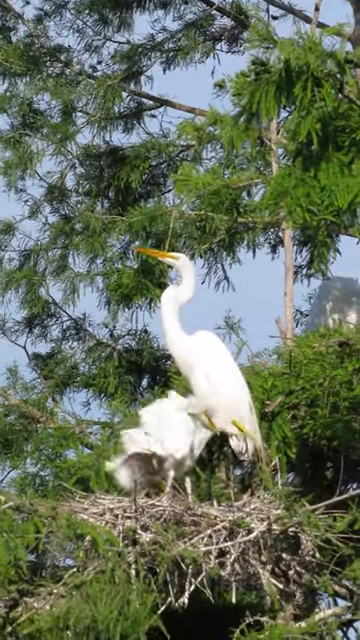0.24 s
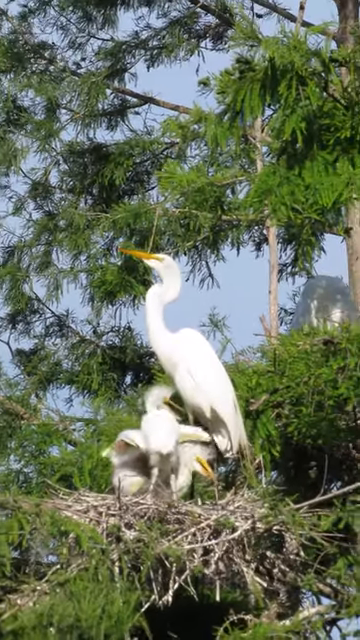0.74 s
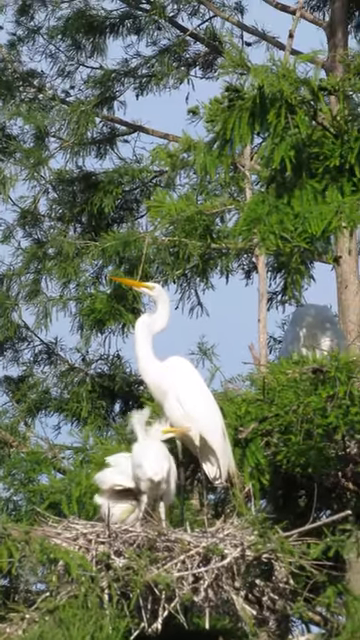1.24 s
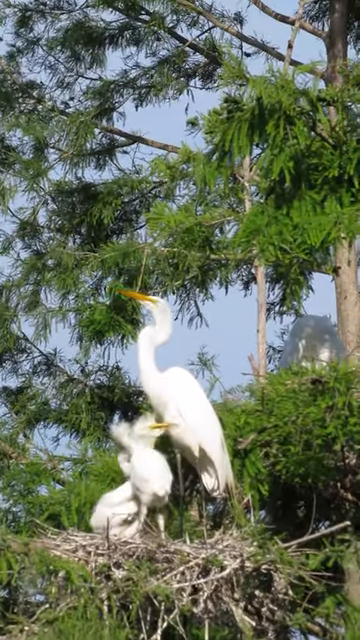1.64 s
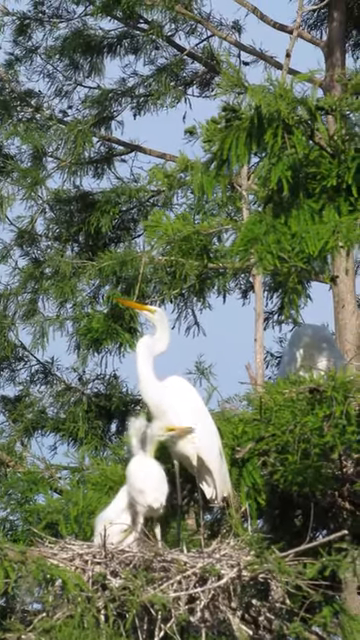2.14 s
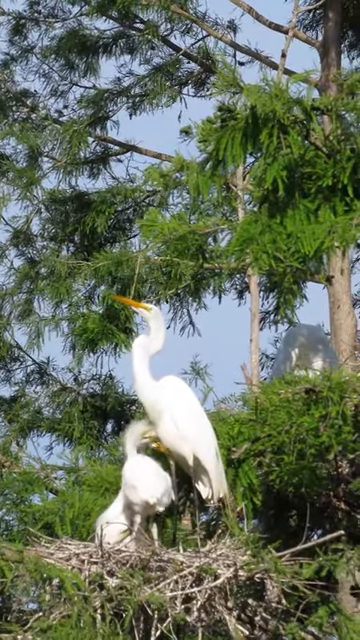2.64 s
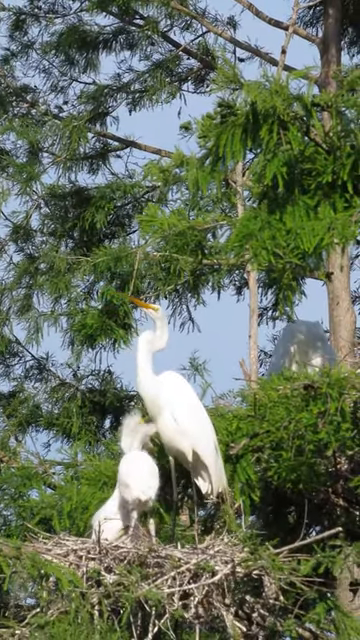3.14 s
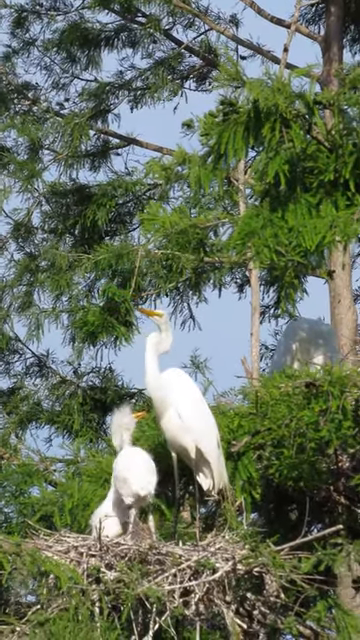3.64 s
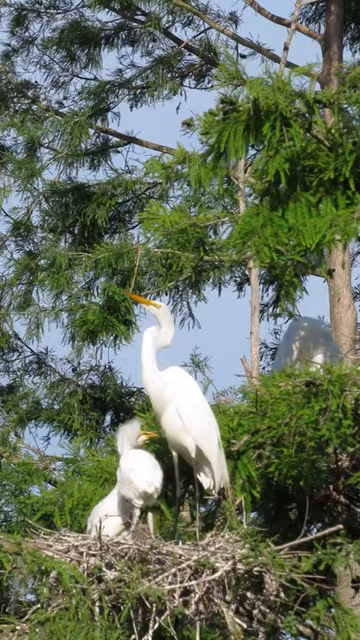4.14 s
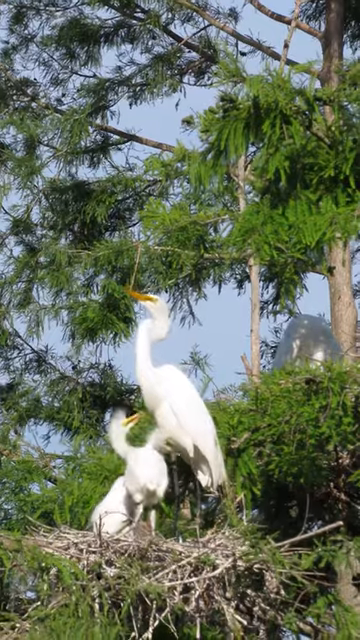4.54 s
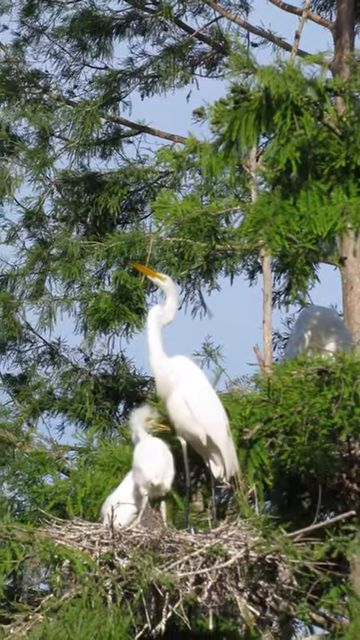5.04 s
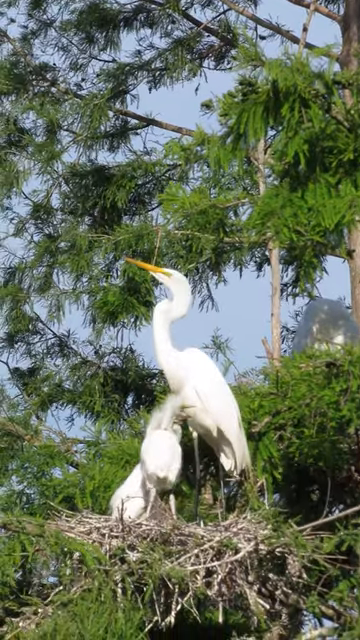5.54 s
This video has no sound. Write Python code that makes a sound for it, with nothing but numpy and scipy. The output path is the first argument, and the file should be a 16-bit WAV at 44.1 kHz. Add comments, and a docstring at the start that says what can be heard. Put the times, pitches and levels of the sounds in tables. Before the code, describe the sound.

Egret chicks beg with a steady run of short, harsh squawks and a few bill snaps over a faint low hum.

```python
"""Egret chicks begging at the nest

High in a tree the chicks give a run of short harsh calls: rough syrinx pulses ring through windpipe,
throat and gaping bill, and now and then a bill snaps. Early on a far egret croaks and a songbird
whistles; the wood throws it all back. The colony murmurs in front, while a low hum and light wind
reach the two microphones of a small camera separately."""
import sys
import numpy as np
from scipy import signal
from scipy.io import wavfile
from scipy.ndimage import uniform_filter1d

SR = 44100
rng = np.random.default_rng(int(sys.argv[2]) if len(sys.argv) > 2 else 0)


def pcm_store(signal):
    """Save signal as 16-bit PCM."""
    levels = np.round(np.clip(np.atleast_2d(signal), -1, 1) * 32767)
    wavfile.write(sys.argv[1], SR, levels.astype(np.int16).T)


N = 255339


def gain_of(db):
    """Decibels to gain."""
    return 10 ** (np.asarray(db) / 20)


def unit_rms(x):
    """Scales to rms 1."""
    return x / np.sqrt(np.mean(x ** 2) + 1e-20)


def curve_at(points, hz):
    """Reads a table on a log-frequency axis."""
    f, value = np.transpose(points)
    return np.interp(np.log(hz + 1), np.log(f + 1), value)


def add(mix, start_s, sound):
    """Drops a sound into the mix."""
    part = mix[max(round(start_s * SR), 0):][:len(sound)]
    part += sound[:len(part)]


def resonate(x, hz, width_hz):
    """A steep, sweepable resonance: shift hz down to zero, smooth twice, shift back."""
    carrier = np.exp(2j * np.pi * np.cumsum(hz * np.ones(len(x))) / SR)
    r = np.exp(-np.pi * width_hz / SR)
    return 2 * (carrier * signal.lfilter([(1 - r) ** 2], [1, -2 * r, r * r], x / carrier)).real


def wander(n, size):
    """Random drift of rms 1, smoothed over size samples."""
    return unit_rms(uniform_filter1d(rng.standard_normal(n), size))


def patchy_noise(spectrum, patchy_db, channels, patch_bins):
    """A shaped noise bed of rms 1 in which patches of the spectrum swell and fade."""
    frames, hz = N // 256 + 5, np.fft.rfftfreq(1024, 1 / SR)
    real, imag, patches = rng.standard_normal((frames, 513, channels, 3)).T
    patches = unit_rms(uniform_filter1d(uniform_filter1d(patches, patch_bins, 1), 14, 2))
    spectra = (real + 1j * imag) * gain_of(curve_at(spectrum, hz)[:, None] + patchy_db * patches)
    return unit_rms(signal.istft(spectra, nperseg=1024, noverlap=768)[1][:, :N])


# Tone colour of the hum and hiss: f/Hz, relative level/dB
HUM_SPECTRUM = [(15, -39), (40, -10), (110, 2.5), (230, -4.5), (430, -11.5), (516, -9.5), (620, -20.5),
                (690, -42.5), (780, -18), (950, -18), (1500, -26), (2500, -49), (5000, -34), (8000, -32.5),
                (11000, -34), (14800, -41.5)]
# Hum faders: left level/dB, right level/dB
HUM_LEVELS = [-42.5, -43.5]


def hum():
    """A wide bed of low hum and faint hiss, separate noise on each microphone."""
    bed = gain_of(HUM_LEVELS)[:, None] * patchy_noise(HUM_SPECTRUM, 0.36, channels=2, patch_bins=12)
    return bed - 0.03 * bed[::-1]  # the sides lean slightly apart in phase


# Tone colour of the colony: f/Hz, relative level/dB
COLONY_SPECTRUM = [(500, -6), (900, 5), (1300, 6.5), (2000, 4.5), (3100, 6.5), (4200, 2), (5000, -4.5),
                   (7000, -6), (10000, -14.5), (14000, -45)]
# Fader ride of the colony: t/s, level/dB
COLONY_LEVELS = [(0, -52), (.4, -55), (.6, -53), (5.79, -52)]


def colony():
    """Many birds blur into a shifting murmur, dead centre."""
    level_db = np.interp(np.arange(N) / SR, *np.transpose(COLONY_LEVELS))
    return gain_of(level_db) * patchy_noise(COLONY_SPECTRUM, 3.45, channels=1, patch_bins=4)


# Gusts on the microphones: peak t/s, level/dB, rise and fall/s
WIND_GUSTS = [(1.15, -65, 0.084), (4.35, -44, .15), (4.75, -34.5, .1), (5.1, -45, 0.15)]


def wind(calm_db=-78):
    """Air buffets each microphone on its own: a lumpy rumble, strongest to the sides."""
    lumps = gain_of(1.5 * np.array([wander(N, size=3000), wander(N, size=3000)]))
    low_band = signal.butter(2, [18, 75], "band", fs=SR, output="sos")
    rumble = signal.sosfilt(low_band, rng.standard_normal((2, N)))
    rumble = rumble - 0.54 * rumble[::-1]
    t = np.arange(N) / SR
    gusts = sum(gain_of(db) * np.exp(-((t - s) / width) ** 2) for s, db, width in WIND_GUSTS)
    return (gain_of(calm_db) + gusts) * unit_rms(lumps * rumble)


def syrinx(hz, rough):
    """The egret's voice source: jittered, uneven pulses with a puff of noise in each cycle."""
    turns = np.cumsum(hz * (1 + .1 * rough * wander(len(hz), size=120))) / SR
    cycle = turns.astype(int)
    strength = gain_of(0.77 * rough * rng.standard_normal(2000)[cycle])
    pulses = strength * (np.diff(cycle, prepend=-1) > 0)
    puffs = (0.31 + np.exp(-(turns % 1) / 0.38)) * rng.standard_normal(len(hz))
    return np.sqrt(1 - rough) * unit_rms(pulses) + np.sqrt(rough) * unit_rms(puffs)


# Far egret cues: t/s, length/s, level/dB, first throat f/Hz, last throat f/Hz
FAR_CROAKS = [(0, 0.016, -48.5, 1530, 1520), (0.027, 0.031, -50, 1510, 1510),
              (0.074, 0.034, -52, 1530, 1500), (0.191, 0.18, -52, 1240, 1250),
              (0.344, 0.062, -50, 1225, 1380)]


def croak(length, db, first_hz, last_hz):
    """Slow rough pulses through one throat resonance, swelling and fading."""
    n = round(length * SR)
    pulses = syrinx(hz=np.full(n, 150.), rough=0.53)
    throat = resonate(pulses, np.linspace(first_hz, last_hz, n), width_hz=190)
    return gain_of(db) * signal.windows.tukey(n, .6) * unit_rms(throat)


# Songbird phrase, one curve a note: t/s, f/Hz, level/dB
SONGBIRD_NOTES = [
    [(.124, 6600, -54), (.13, 7550, -49), (.138, 7650, -52), (.15, 7950, -60)],
    [(.17, 3120, -62), (.195, 3050, -58), (.215, 3010, -65)],
    [(.25, 6390, -59), (.29, 6900, -54), (.33, 7450, -49), (.36, 7480, -49), (.425, 7330, -50)],
    [(.44, 2500, -62), (.46, 2500, -58), (.48, 2490, -62)],
    [(.48, 8050, -65), (.5, 8100, -62), (.53, 8100, -65)],
    [(.51, 3115, -59), (.528, 3126, -54), (.56, 3140, -58)],
    [(.535, 6330, -58), (.547, 6417, -50), (.57, 6400, -56), (.641, 6440, -59), (.7, 6550, -55),
     (.72, 6550, -62)],
]


def whistle(note):
    """A songbird's gliding near-sine, trembling a little in pitch and level."""
    times, pitches, levels = np.transpose(note)
    t = np.arange(times[0], times[-1], 1 / SR)
    hz = np.interp(t, times, pitches) * (1 + .003 * wander(len(t), size=150))
    db = np.interp(t, times, levels) + 3 * wander(len(t), size=250)
    return np.sin(2 * np.pi * np.cumsum(hz) / SR) * gain_of(db) * signal.windows.tukey(len(t), .1)


def windpipe(x, spacing_hz, bounce):
    """An open tube: each pulse bounces to and fro, leaving evenly spaced resonances."""
    at = np.arange(len(x))
    return sum(bounce ** k * np.interp(at - k * SR / spacing_hz, at, x, left=0) for k in range(9))


def steadied(x):
    """Gentle levelling, as from a steady breath."""
    return x / np.sqrt(uniform_filter1d(x ** 2, 400) + 0.44 * np.mean(x ** 2))


# Chick cues, levels before shaping: t/s, length/s, gape level/dB, first gape f/Hz, wide gape f/Hz,
# opening time/s, throat level/dB, first throat f/Hz, first windpipe spacing/Hz, first pulse rate/Hz,
# rasp f/Hz, rasp level/dB
BEGGING_CALLS = [(.624, 0.05, -38, 1860, 2400, 0.058, -57, 2060, 601, 271.6, 5900, -57),
                 (0.834, 0.077, -39, 2670, 3360, 0.039, -38.5, 2350, 594, 312.7, 5240, -54.5),
                 (1.029, .075, -40, 2640, 3950, 0.036, -35.5, 2570, 602, 439.3, 6800, -58),
                 (1.300, 0.059, -46.5, 3900, 4220, 0.018, -38.5, 2200, 603, 330.7, 5200, -58),
                 (1.491, 0.099, -41, 2660, 3930, 0.037, -42.5, 2190, 597, 241.5, 6760, -59.5),
                 (1.74, 0.064, -34.5, 2170, 3280, 0.039, -33, 2220, 603, 247.7, 5500, -57.5),
                 (1.927, .072, -38, 2520, 3380, 0.038, -34.5, 2440, 601, 356.4, 4480, -49),
                 (2.187, 0.072, -35.5, 1850, 3540, 0.046, -33.5, 2160, 584, 308.5, 4970, -57.5),
                 (2.376, 0.087, -35.5, 3370, 4300, 0.031, -37.5, 2270, 604, 303, 6750, -59.5),
                 (2.629, 0.066, -32.5, 2270, 3200, 0.043, -31.5, 2390, 602, 363.7, 4430, -51),
                 (2.824, 0.062, -31.5, 3000, 4020, 0.023, -42, 2070, 610, 322.8, 5900, -50.5),
                 (3.073, 0.079, -40.5, 1960, 3950, 0.051, -32.5, 2270, 604, 373.7, 5600, -57),
                 (3.262, 0.074, -36, 2600, 4260, 0.046, -33.5, 2360, 608, 366.5, 5830, -53),
                 (3.527, .075, -36, 2180, 3300, 0.046, -34, 2250, 604, 328, 5100, -63),
                 (3.715, 0.072, -37, 2790, 3500, .045, -36.5, 2280, 601, 299.2, 4840, -53),
                 (3.805, 0.052, -51, 3300, 3500, .025, -51.5, 2320, 550, 400, 5500, -61),
                 (3.977, 0.067, -35.5, 2380, 3620, 0.048, -36, 2350, 605, 209, 5200, -53.5),
                 (4.163, .072, -34, 2750, 3760, 0.039, -39, 2320, 607, 294.8, 4870, -50.5),
                 (4.421, 0.079, -40.5, 1930, 3370, 0.052, -35, 2180, 592, 308.6, 4760, -53),
                 (4.625, 0.069, -36.5, 2840, 3540, 0.028, -43, 2060, 606, 507.4, 4970, -51.5),
                 (4.796, 0.055, -48, 4340, 4200, 0.021, -40.5, 1960, 543, 498.5, 5200, -58),
                 (4.886, 0.09, -33, 2150, 2870, 0.041, -39, 2220, 588, 315.8, 4730, -53),
                 (5.048, 0.068, -49.5, 4270, 4300, .012, -40.5, 2040, 542, 469.4, 5800, -58),
                 (5.071, 0.086, -41, 2300, 4150, .042, -35, 2370, 606, 400, 6340, -58),
                 (5.287, 0.062, -41.5, 4500, 4450, 0.014, -38.5, 1980, 545, 465, 5800, -51.5),
                 (5.347, 0.077, -34.5, 2140, 3100, 0.037, -39.5, 2040, 594, 311.2, 5300, -59),
                 (5.533, 0.05, -40.5, 4500, 4480, 0.015, -38, 2010, 549, 396, 5900, -51),
                 (5.539, 0.076, -39.5, 2500, 3900, 0.043, -34.5, 2160, 608, 316.3, 5550, -55),
                 (5.749, 0.028, -56, 2930, 3200, .02, -48, 2120, 600, 715, 6000, -71)]


def beg(length, gape_db, first_gape_hz, wide_hz, wide_s, throat_db, throat_hz, spacing_hz, pulse_hz,
        rasp_hz, rasp_db):
    """A chick's squawk: the pulses speed up as the bill opens, sweeps the gape resonance and shuts."""
    t = np.arange(0, length, 1 / SR)
    hold_s, closing_s, swell_s, release_s, edge_s = 0.0065, 0.038, 0.015, 0.02, 0.003
    opening = np.sin(np.pi / 2 * np.minimum(t / wide_s, 1)) ** 1.55
    closing = np.clip((t - wide_s - hold_s) / closing_s, 0, 1) ** 0.97
    # a call begun with the bill shut starts softer and swells
    shut_khz = max(2830 - first_gape_hz, 0) / 1000
    swell_db = (-1.5 - 12.5 * shut_khz) * np.exp(-(t / swell_s) ** 2)
    breath_db = swell_db - 5.5 * np.clip(1 - (length - t) / release_s, 0, 1)
    bill_db = 3 * (1 - opening) - 15.5 * closing + breath_db

    strain = np.tanh(t / 0.063)  # faster pulses, a shorter neck
    pulses = syrinx(pulse_hz * (1 + .17 * strain), rough=.2 + .33 * t / t[-1])
    pipe_hz = spacing_hz * (1 + 0.071 * strain)
    tube = windpipe(pulses, pipe_hz, bounce=0.54)

    # the throat ducks around the widest gape, more after a long climb
    climb_khz = max(wide_hz - first_gape_hz, 0) / 1000
    duck_db = -10 * climb_khz * np.exp(-((t - 0.99 * wide_s) / 0.011) ** 2)
    throat_db = throat_db + duck_db + 0.5 * (1 - closing) + breath_db
    throat_hz = throat_hz - 148 * (t / length) ** 3  # sags as the breath runs out
    throat = resonate(resonate(tube, throat_hz, 1020), throat_hz, 1020)
    throat = gain_of(throat_db) * steadied(throat)

    gape_hz = first_gape_hz + (wide_hz - first_gape_hz) * (opening - closing)
    gape = resonate(resonate(tube, gape_hz, 1680), gape_hz, 1700)
    bill_lowpass = signal.butter(6, 4620, fs=SR, output="sos")
    gape = gain_of(gape_db + bill_db) * steadied(signal.sosfilt(bill_lowpass, gape))

    # a shut bill holds the rasp back until it opens
    rasp_db = rasp_db + .5 * bill_db - 3 * shut_khz * (0.5 - opening)
    rasp = gain_of(rasp_db) * unit_rms(resonate(tube, rasp_hz, 3100) + 0.043 * tube)
    chest_db = throat_db - 22 + 0.15 * (597 - spacing_hz)  # fuller in a longer neck
    chest = gain_of(chest_db) * unit_rms(resonate(tube, 2 * pipe_hz, 120))
    fades = np.minimum(t / edge_s, 1) * np.minimum((length - t) / edge_s, 1)
    return (throat - gape + rasp + chest) * fades


# Bill snap cues: t/s, level/dB, f/Hz
BILL_SNAPS = [(3.148, -37, 1580), (3.787, -38.5, 1480), (4.047, -34, 1490), (5.7363, -39.5, 1380)]


def snap(db, hz, attack_s=0.00027, t60_s=0.022):
    """A short hollow knock of the bill: one damped mode."""
    t = np.arange(400) / SR
    return gain_of(db - 60 * t / t60_s) * np.sin(2 * np.pi * hz * t) * np.minimum(t / attack_s, 1)


# Reverb time of the wood: f/Hz, t60/s
WOOD_DECAY = [(1000, 0.45), (2600, 0.33), (5000, 0.38), (9000, 0.21)]


def wood_echo(x):
    """Trunks and leaves scatter the sound: sparse taps, each band dying at its own speed."""
    taps = np.zeros(SR // 2)
    at = np.arange(300, SR // 2 - 20, 20) + rng.integers(0, 20, (SR // 2 - 301) // 20)
    taps[at] = rng.choice([-1., 1.], at.shape)
    hz, t, spectra = signal.stft(taps, SR, nperseg=256)
    decay = gain_of(-60 * t / curve_at(WOOD_DECAY, hz)[:, None])
    tail = signal.istft(spectra * decay, SR, nperseg=256)[1]
    return signal.fftconvolve(x, tail / np.linalg.norm(tail))[:N]


def leafy_echo(x, flutter_hz=23):
    """Moving leaves keep changing the echo: the send crossfades round three tails."""
    phase = 2 * np.pi * flutter_hz * np.arange(N) / SR
    sends = (np.sqrt((1 + np.cos(phase + 2 * np.pi * k / 3)) / 3) for k in range(3))
    return sum(wood_echo(x * send) for send in sends)


def scene():
    """Birds in front with their echoes, over beds of hum, colony and wind."""
    birds = np.zeros(N)
    for start_s, *call in FAR_CROAKS:
        add(birds, start_s, croak(*call))
    for note in SONGBIRD_NOTES:
        add(birds, note[0][0], whistle(note))
    for start_s, *call in BEGGING_CALLS:
        add(birds, start_s, beg(*call))
    for start_s, db, hz in BILL_SNAPS:
        add(birds, start_s, snap(db, hz))
    direct = birds * gain_of([[.2], [-.2]])  # a hair left of centre
    side_echo = gain_of(-20.5) * wood_echo(birds) * np.array([[1], [-1]])
    centre_echo = gain_of(-7.5) * leafy_echo(birds)
    return direct + centre_echo + side_echo + hum() + colony() + wind()


def record(dry):
    """The camera's band limit: a steep high cut."""
    high_cut = signal.firwin(1023, cutoff=14880, window=("kaiser", 9), fs=SR)
    return signal.oaconvolve(dry, high_cut[None], "same")


dry = scene()
out = record(dry)
pcm_store(out)
```